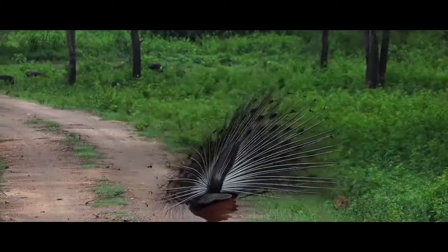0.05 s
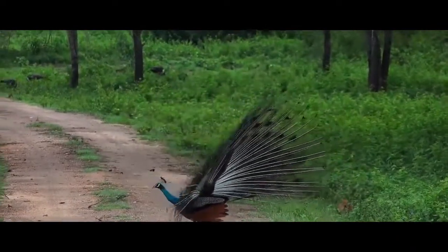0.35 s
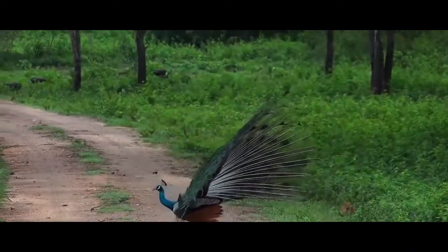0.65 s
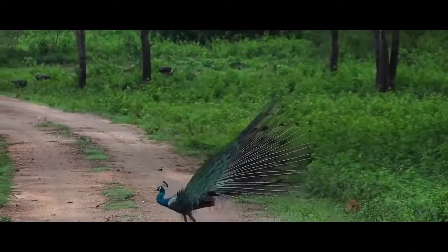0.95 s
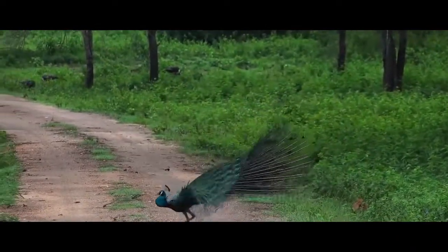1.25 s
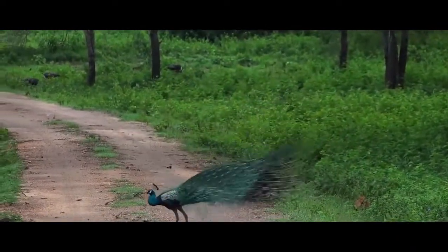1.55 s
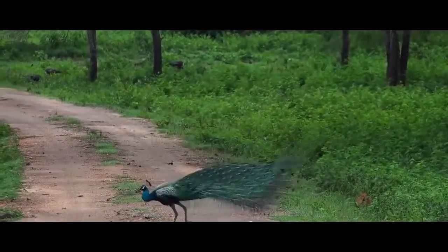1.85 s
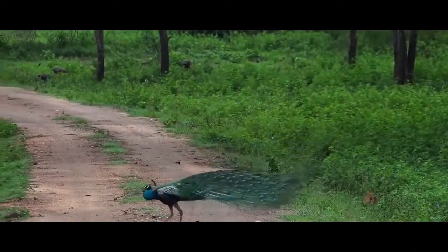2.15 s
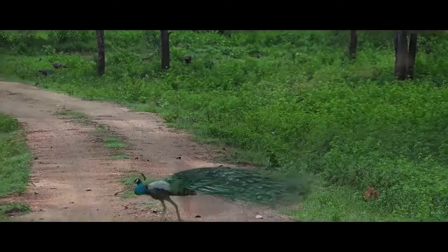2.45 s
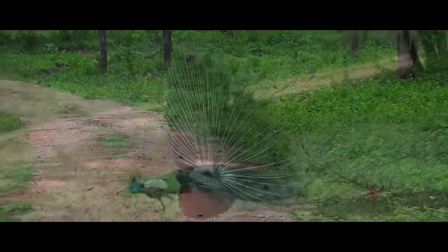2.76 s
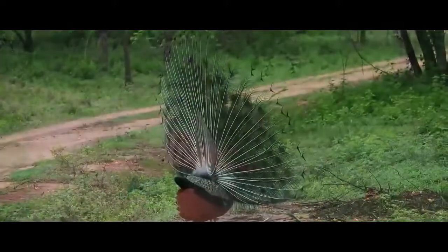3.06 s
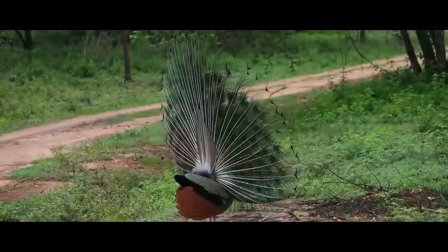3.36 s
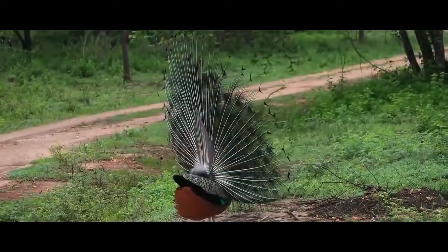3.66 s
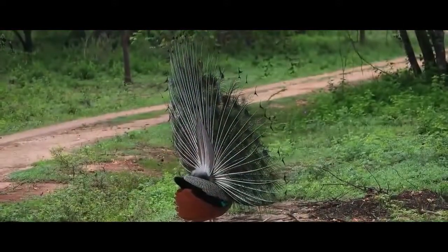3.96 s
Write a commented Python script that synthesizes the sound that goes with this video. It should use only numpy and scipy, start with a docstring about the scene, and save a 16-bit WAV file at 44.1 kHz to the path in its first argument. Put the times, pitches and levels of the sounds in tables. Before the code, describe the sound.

Crickets trill steadily among trees as a bird whistles a short row of notes.

```python
"""A dense chorus of crickets at the edge of a wood, each scraping its wings in quick, falling strokes.
A songbird ticks, whistles a row of notes with raspy endings, then gives short chips.
Other birds call from far away, and trunks and leaves scatter the calls into a short echo.
Under it all lie a low rumble, a faint hiss and two soft gusts. Late on, the chorus dips a little."""
import sys
import numpy as np
from scipy import signal
from scipy.fft import rfft, irfft
from scipy.io import wavfile
from scipy.ndimage import uniform_filter1d

SR = 44100
rng = np.random.default_rng(int(sys.argv[2]) if len(sys.argv) > 2 else 0)


def store_pcm(level_fs):
    """Save levels as 16-bit WAV."""
    pcm = np.round(np.clip(level_fs, -1, 1) * 32767).astype(np.int16)
    wavfile.write(sys.argv[1], SR, np.atleast_2d(pcm).T)


N = 176400
T = np.arange(N) / SR
STROKE_GAP_S = .0315  # from one wing stroke of a cricket to the next


def amp(db):
    """Turns decibels into a number to multiply a sound by."""
    return 10 ** (np.asarray(db) / 20)


def unit_level(x):
    """Scales a signal so that its average size (rms) is 1."""
    return x / np.sqrt(np.mean(x ** 2) + 1e-20)


def look_up(points, hz):
    """Reads between the rows of a frequency table, giving each octave equal room."""
    f, value = np.transpose(points)
    return np.interp(np.log(hz + 1), np.log(np.sort(f) + 1), value)


def add(mix, s, sound):
    """Mixes a sound in at s seconds, dropping whatever falls outside the mix."""
    at = round(s * SR)
    sound = sound[..., max(-at, 0):]
    part = mix[..., max(at, 0):][..., :sound.shape[-1]]
    part += sound[..., :part.shape[-1]]


def pan(db):
    """Left and right gains, with the left louder by db."""
    return amp(np.array([[db / 2], [-db / 2]]))


def coloured(x, spectrum):
    """Turns each frequency up or down as a table says, then scales to rms 1."""
    gain = amp(look_up(spectrum, np.fft.rfftfreq(N, 1 / SR)))
    return unit_level(irfft(rfft(x) * gain, N))


def wander(hz):
    """A smooth random wobble, up to about hz times a second."""
    rolloff = 1 + (np.fft.rfftfreq(N, 1 / SR) / hz) ** 4
    return unit_level(irfft(rfft(rng.standard_normal(N)) / rolloff, N))


def noise(side_db):
    """Stereo noise: the higher side_db, the wider it sounds."""
    mid, side = rng.standard_normal((2, N))
    return np.array([mid + amp(side_db) * side, mid - amp(side_db) * side])


def woods(x, echo_db, side_db):
    """Adds the echo scattered by trunks and leaves, each frequency dying at its own speed."""
    # how long the echo lasts: f/Hz, time to fade by 60 dB/s
    fade_times = [(200, 1), (800, 0.41), (3000, 0.53), (12000, 0.27)]
    hz, t, bands = signal.stft(noise(side_db)[:, :SR], SR, nperseg=256)
    fade = amp(-60 * t / look_up(fade_times, hz)[:, None])
    tail = signal.istft(bands * fade, SR, nperseg=256)[1]
    tail *= np.minimum(T[:tail.shape[1]] / 0.002, 1)
    tail /= np.linalg.norm(tail[0])
    return x + amp(echo_db) * signal.fftconvolve(x, tail, axes=1)[:, :N]


def chirp(strokes, hz, sag_hz_per_s, rough):
    """Wing strokes: each swells fast, then sags in pitch and fades as the wing's scraper slows."""
    width_s, sag_onset_s = .0031, .00202
    first_stroke_db, spread_db, octave_db = -5, 1.35, -32.5
    t = np.arange(-STROKE_GAP_S / 2, STROKE_GAP_S / 2, 1 / SR)
    u = np.maximum(t / width_s, -10)
    swell = np.exp(.5 * (1 - u - np.exp(-u))) * np.clip((t[-1] - t) / width_s, 0, 1)
    sag_hz = sag_hz_per_s * sag_onset_s * (np.logaddexp(0, t / sag_onset_s) - 1)
    out = np.zeros(round((strokes + 1) * STROKE_GAP_S * SR))
    for k in range(strokes):
        detune, force, start = rng.standard_normal(3)
        phase = 2 * np.pi * (np.cumsum(hz * (1 + .004 * detune) - sag_hz) / SR + start)
        tone = np.sqrt(2) * (np.sin(phase) + amp(octave_db) * np.sin(2 * phase))
        teeth = np.interp(t, np.linspace(t[0], t[-1], 32), rng.standard_normal(32))
        gain = amp(spread_db * force + first_stroke_db / (k + 1) ** 2)
        add(out, (k + .5) * STROKE_GAP_S, gain * swell * (1 + rough * teeth) * tone)
    return out


def near_crickets():
    """The few crickets that stand out, three strokes to a chirp, each chirp from its own direction."""
    # the chirps: t/s of the first stroke, f/Hz, level/dB
    chirps = [(-.041, 6830, -35), (.03, 8060, -50), (.103, 6220, -34), (.268, 6220, -38),
              (0.395, 5670, -37.5), (.559, 7900, -46.5), (.617, 6870, -36.5), (.72, 6250, -36),
              (.76, 6740, -39), (0.889, 5980, -37.5), (.972, 6380, -37.5), (1.02, 6120, -38),
              (1.069, 5640, -37.5), (1.189, 8100, -49.5), (1.257, 6880, -37), (1.52, 6700, -34.5),
              (1.75, 6420, -39.5), (1.841, 6080, -35.5), (1.846, 8060, -47.5), (1.946, 6880, -36),
              (2.174, 6220, -38.5), (2.286, 6770, -39.5), (2.428, 6350, -38), (2.569, 6930, -36.5),
              (2.602, 8120, -50), (2.604, 6100, -36.5), (3.193, 6640, -34), (3.409, 6430, -40),
              (3.584, 7360, -42), (3.59, 6230, -34.5), (3.811, 6680, -39)]
    # how fast a stroke's pitch falls: f/Hz, fall/(Hz per s)
    sag_rates = [(6650, 66000), (6850, 27000)]
    out = np.zeros((2, N))
    for s, hz, db in chirps:
        sound = amp(db + 5.5) * chirp(strokes=3, hz=hz, sag_hz_per_s=look_up(sag_rates, hz), rough=.4)
        start_s = s - STROKE_GAP_S  # the first stroke peaks one gap into the chirp
        ear_lag_s = rng.normal(0, 2.2e-5)
        add(out[0], start_s + ear_lag_s, sound)
        add(out[1], start_s, sound)
    return woods(pan(-1.1) * out, echo_db=-9, side_db=2)


def far_crickets(count=64, low_hz=3906, high_hz=7050, every_s=.62, spread_db=18):
    """Dozens of crickets, each on its own pitch and beat, over the haze of countless more."""
    # tone colour of the chorus: f/Hz, level/dB
    spectrum = [(3000, -50), (3550, -21.5), (3850, -6.5), (4180, -3), (4450, -7), (4750, -2.5), (5100, 1.5),
                (5550, -1), (5800, -8), (6100, -3), (6750, -4.5), (7050, -11), (7400, -19.5), (8000, -75)]
    # loudness of the chorus over time: t/s, level/dB
    levels = [(0, -34.5), (.46, -36.5), (.53, -37), (1.05, -34.5), (1.35, -35.5), (2.85, -35.5),
              (3.3, -39.5), (3.9, -37)]
    out = np.zeros((2, N))
    for hz in np.linspace(low_hz, high_hz, count):
        beat, pace, nearness, place = rng.random(4)
        gain = amp(spread_db * nearness) * pan(12 * (place - .5))
        for k in range(-1, 8):
            s = (k + beat) * every_s * (.85 + .3 * pace)
            add(out, s, gain * chirp(strokes=4, hz=hz, sag_hz_per_s=61300, rough=.36))
    hz, db = np.transpose(spectrum)
    tilt_db = 6 * np.log2(hz / low_hz)  # high voices are heard one by one, low ones merge into the haze
    voices = coloured(woods(out, echo_db=-6.5, side_db=-6.5), np.column_stack([hz, db + tilt_db]))
    flickering = noise(side_db=-39) * amp(1.5 * wander(hz=476))
    haze = coloured(flickering, np.column_stack([hz, db - tilt_db]))
    loudness = amp(np.interp(T, *np.transpose(levels)))
    return pan(-1) * loudness * (amp(-1.5) * voices + amp(-.5) * haze)


def air_noise():
    """Stereo noise, narrow in the deepest bass and widest where the high insects sing."""
    # stereo width: f/Hz, level/dB of the side signal against the middle
    widths = [(30, -25), (300, -2.5), (2500, -27), (9600, 3), (13000, -13)]
    mid, side = rng.standard_normal((2, N))
    side = irfft(rfft(side) * amp(look_up(widths, np.fft.rfftfreq(N, 1 / SR))), N)
    return np.array([mid + side, mid - side])


def air(blend_from_s=2.36, blend_to_s=3.2):
    """Low rumble, leaf hiss and the fizz of high insects, growing a little brighter late on."""
    # tone colour of the air at first: f/Hz, level/dB
    early_spectrum = [(20, -20), (62, -1), (150, 2), (260, -15), (600, -18), (1550, -19.5), (1950, -16),
                      (7500, -13), (8900, -21.5), (9900, -12), (11000, -30.5), (11900, -21), (15000, -36)]
    # tone colour of the air later: f/Hz, level/dB
    late_spectrum = [(20, -33), (65, 3.5), (260, -16), (1600, -21.5), (2900, -13), (7300, -10.5),
                     (8800, -16), (9800, -7.5), (11300, -29.5), (12700, -22), (15000, -40)]
    early = amp(-48.5) * coloured(air_noise() * amp(.98 * wander(hz=115)), early_spectrum)
    late = amp(-47) * coloured(air_noise() * amp(.69 * wander(hz=123)), late_spectrum)
    blend = np.clip((T - blend_from_s) / (blend_to_s - blend_from_s), 0, 1)
    out = np.sqrt(1 - blend) * early + np.sqrt(blend) * late
    bass = signal.filtfilt(*signal.butter(1, 200, fs=SR), out)
    narrow_bass = pan(3.7) * (.64 * bass.mean(0) + .22 * bass)
    return out - bass + narrow_bass


def whistle(points, waver, edge_s=.0081, third_harmonic_db=-25):
    """A bird's almost pure tone, wavering as it follows rows of t/s, f/Hz, level/dB."""
    s, hz, db = np.transpose(points)
    pitch_hz = np.interp(T, s, hz) * (1 + waver * wander(hz=88))
    phase = 2 * np.pi * np.cumsum(pitch_hz) / SR
    tone = np.sqrt(2) * (np.sin(phase) + amp(third_harmonic_db) * np.sin(3 * phase))
    ramp = np.clip(np.minimum(T - s[0], s[-1] - T) / edge_s / 2 + .5, 0, 1)
    return np.sin(ramp * np.pi / 2) ** 2 * amp(np.interp(T, s, db)) * tone


def glide(length_s, first_hz, middle_hz, last_hz, db, rough, rasp_hz=266):
    """A short bird note bent through three pitches; rough (0 to 1) smears it into a rasp."""
    u = np.linspace(0, 1, max(round(length_s * SR), 16))
    hz = np.polyval(np.polyfit([0, .5, 1], [first_hz, middle_hz, last_hz], 2), u)
    hiss = rng.standard_normal((2, SR // 2))
    a, b = signal.lfilter(*signal.butter(2, rasp_hz, fs=SR), hiss)[:, -len(u):]
    rasp = (unit_level(a) + 1j * unit_level(b)) / np.sqrt(2)  # shakes both loudness and phase
    voice = np.sqrt(1 - rough ** 2) + rough * rasp
    tone = np.sqrt(2) * (voice * np.exp(2j * np.pi * np.cumsum(hz) / SR)).real
    return amp(db) * abs(np.sin(np.pi * u)) ** .19 * tone


def distant_birds(throb_hz=45, throb_from_s=3.45, throb_to_s=3.67):
    """Thin sliding whistles and one long wail that throbs midway, from deep among the trees."""
    # the calls: t/s, length/s, first f/Hz, middle f/Hz, last f/Hz, level/dB
    calls = [(.005, 0.11, 2690, 2580, 2690, -59.5), (0.091, 0.15, 2570, 2400, 2740, -57),
             (0.302, 0.088, 2540, 2560, 2840, -58), (0.384, 0.24, 3360, 3060, 2920, -60.5),
             (.815, .13, 481, 419, 345, -60), (2.478, 0.39, 780, 722, 607, -63.5),
             (2.937, 0.11, 3370, 3310, 3270, -54.5), (2.974, .12, 2484, 2350, 2380, -63),
             (3.202, .088, 1814, 1906, 1930, -59.5), (3.66, 0.34, 2347, 2260, 2053, -65)]
    # the path of the wail: t/s, f/Hz, level/dB
    wail = [(3.289, 544, -73), (3.352, 627, -52), (3.367, 743, -54.5), (3.45, 718.4, -59.5),
            (3.77, 700.4, -56.5), (3.825, 623, -55.5)]
    throb_depth = uniform_filter1d(1. * (T > throb_from_s) * (T < throb_to_s), size=1500)
    out = whistle(wail, waver=.0177) * (1 + throb_depth * np.sin(2 * np.pi * throb_hz * T))
    for s, *note in calls:
        add(out, s, glide(*note, rough=.027))
    return woods(amp(1.5) * pan(-4) * out, echo_db=-9.5, side_db=-23)


def gusts():
    """Two soft puffs of wind: low noise that swells and dies away."""
    # the puffs: t/s of the peak, width/s, level/dB, f/Hz above which the noise falls away
    puffs = [(0.359, 0.11, -49, 200), (.86, 0.075, -56, 1240)]
    out = np.zeros((2, N))
    for s, width, db, hz in puffs:
        spectrum = [(25, -18), (70, 0), (hz, -2), (2 * hz, -14), (8 * hz, -36)]
        swell = np.exp(-.5 * ((T - s) / width) ** 2)
        out += amp(db) * swell * coloured(noise(side_db=-11), spectrum)
    return pan(1.3) * out


def songbird():
    """Quick ticks, six whistles of which all but the last break into a rasp, then falling chips."""
    # the ticks: t/s, level/dB
    ticks = [(1.133, -48.5), (1.163, -47.5), (1.189, -49.5), (1.533, -44.5), (1.781, -38), (2.038, -42),
             (2.276, -47.5)]
    # one list of points for each whistle: t/s, f/Hz, level/dB
    whistles = [
        [(1.304, 3250, -30.5), (1.33, 3110, -36.5), (1.372, 2950, -33), (1.388, 2950, -48), (1.411, 2700, -28)],
        [(1.555, 2830, -35), (1.589, 2825, -38.5), (1.62, 2887, -37), (1.634, 2764, -53.5), (1.654, 2800, -26)],
        [(1.801, 2820, -31), (1.809, 2772, -31.5), (1.88, 2746, -34), (1.888, 2620, -44.5),
         (1.912, 2510, -38.5)],
        [(2.054, 2920, -43), (2.098, 2730, -33.5), (2.12, 2670, -33.5), (2.14, 2585, -44), (2.153, 2330, -29.5)],
        [(2.3, 2705, -33.5), (2.322, 2643, -34), (2.342, 2780, -34.5), (2.374, 2720, -38.5), (2.394, 2550, -54)],
        [(2.607, 2733, -32), (2.62, 2627, -32), (2.655, 2540, -38.5), (2.67, 2620, -34.5), (2.685, 2320, -46)],
    ]
    # the chips: t/s, length/s, first f/Hz, middle f/Hz, last f/Hz, level/dB
    chips = [(2.761, .028, 3290, 2960, 2320, -41.5), (2.793, 0.026, 2650, 2592, 2550, -35.5),
             (2.843, 0.044, 2500, 2080, 1730, -44.5), (3.111, 0.019, 3400, 3100, 2780, -44.5),
             (3.137, 0.043, 3240, 2900, 2700, -45.5), (3.422, .022, 3420, 3235, 2820, -44),
             (3.735, 0.035, 3670, 3100, 2770, -46.5), (3.887, 0.039, 3640, 2880, 2555, -47.5)]
    out = sum(whistle(points, waver=.0073) for points in whistles)
    for s, db in ticks:
        add(out, s, glide(length_s=.015, first_hz=3420, middle_hz=2853, last_hz=2730, db=db, rough=.69))
    for points in whistles[:-1]:
        end_s = points[-1][0]
        rasp = glide(length_s=.05, first_hz=2439, middle_hz=2326, last_hz=2266, db=-43, rough=.84)
        add(out, end_s - .005, rasp)
    for s, *note in chips:
        add(out, s, glide(*note, rough=.44))
    return woods(amp(.5) * pan(-4) * out, echo_db=-12, side_db=-28)


def scene():
    """Crickets, birds, air and wind together."""
    return near_crickets() + far_crickets() + songbird() + distant_birds() + air() + gusts()


def record(dry):
    """Cuts away the very highest treble."""
    low_pass = signal.firwin(511, cutoff=15300, window=("kaiser", 9), fs=SR)
    return signal.oaconvolve(dry, low_pass[None], "same")


dry = scene()
out = record(dry)
store_pcm(out)
```